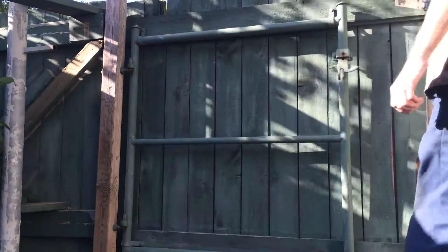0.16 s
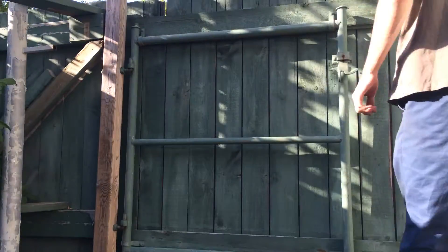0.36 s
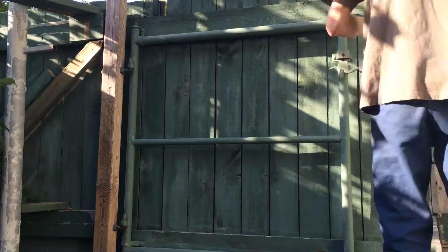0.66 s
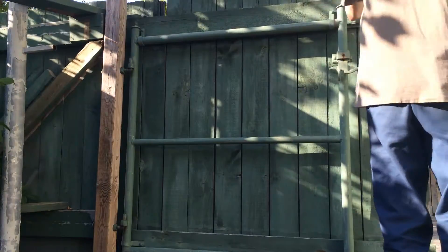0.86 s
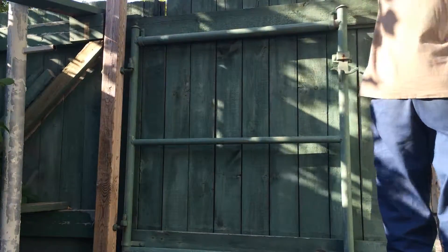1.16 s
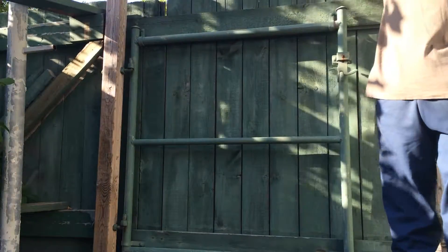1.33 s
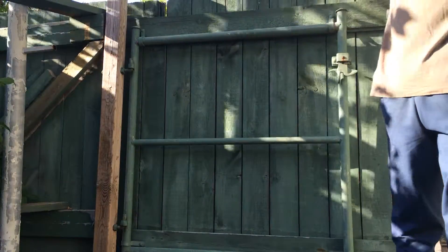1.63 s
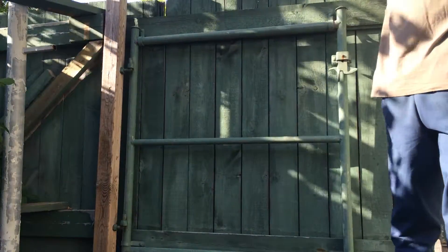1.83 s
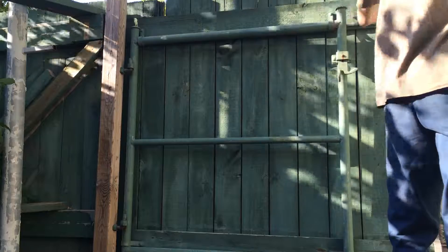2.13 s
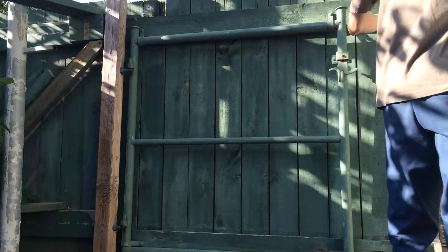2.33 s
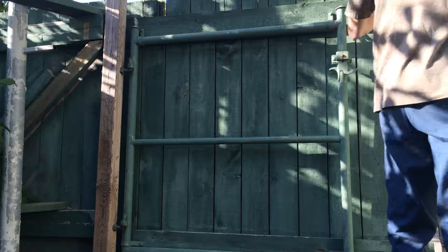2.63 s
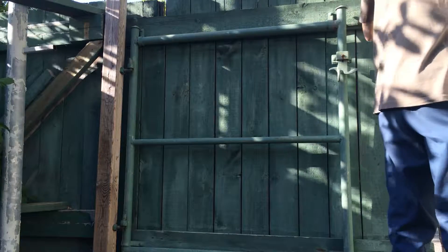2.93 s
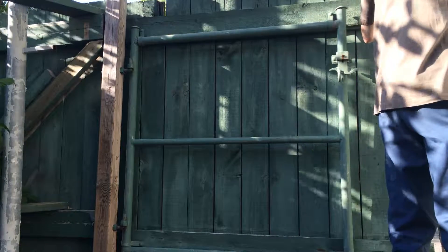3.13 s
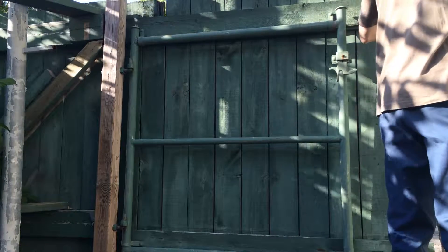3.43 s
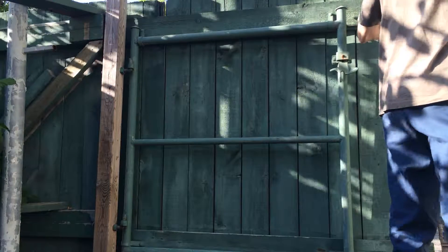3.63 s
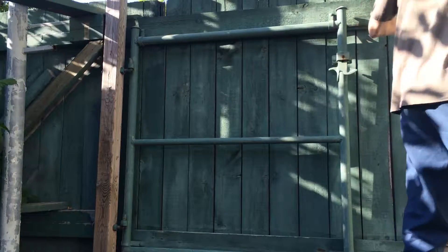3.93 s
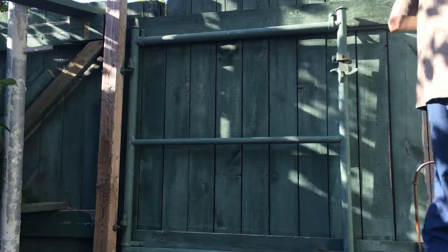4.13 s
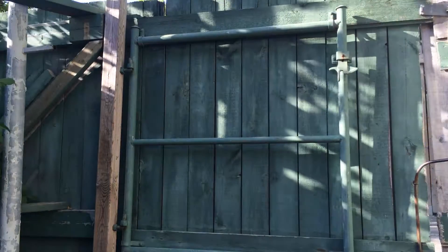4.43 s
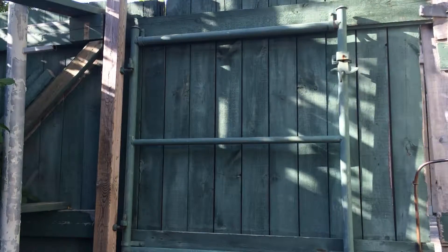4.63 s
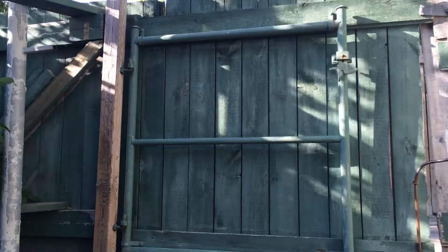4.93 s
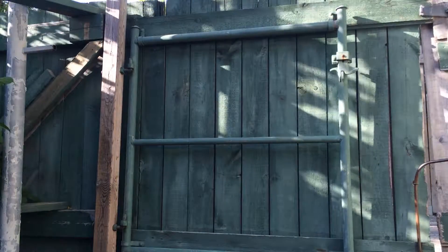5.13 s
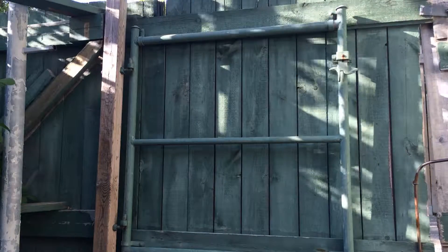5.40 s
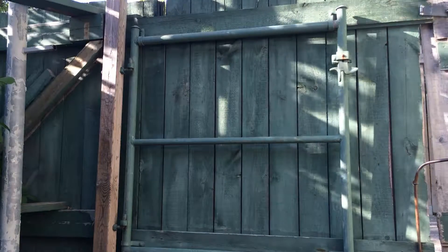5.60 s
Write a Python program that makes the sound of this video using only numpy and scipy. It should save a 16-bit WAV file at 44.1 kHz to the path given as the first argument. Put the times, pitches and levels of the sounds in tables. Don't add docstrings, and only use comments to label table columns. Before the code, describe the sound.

Over a faint outdoor hum, a wooden gate with a steel tube frame is knocked and shaken a few metres from a small microphone. A scrape and wooden thuds come first, then ringing latch drops, a dense run of metal clanks and rattles, a last firm thud, brief hinge squeaks and faint ticks as it settles.

```python
import sys
import numpy as np
from scipy import signal
from scipy.fft import rfft, irfft, next_fast_len
from scipy.io import wavfile
from scipy.ndimage import uniform_filter1d, map_coordinates

SR = 44100
rng = np.random.default_rng(int(sys.argv[2]) if len(sys.argv) > 2 else 0)


def boost_factor(decibels):
    exponent = np.asarray(decibels, float) / 20
    return 10 ** exponent


def master(y):
    cut = np.clip(np.atleast_2d(y).T, -1, 1)
    pcm = np.round(cut * 32767)
    wavfile.write(sys.argv[1], SR, pcm.astype(np.int16))


N = 253969

# freq_hz, density_db
HUM_SPECTRUM = [(12, -47), (20, 0), (178, -7.5), (294, -24.5), (593, -17.5), (807, -23.5), (877, -20.5),
                (1070, -22), (2930, -36), (3980, -35.5), (5270, -38.5), (13300, -48.5), (16200, -53)]
# time_s, pitch_hz, level_db
BIRD_WHISTLE = [
    (5.5, 3358, -62),
    (5.522, 3554, -57),
    (5.536, 4090, -62),
    (5.63, 4010, -73),
]
# freq_hz, t60_s
YARD_DECAY = [(200, 0.26), (1500, 0.36), (5000, 0.27), (14000, 0.18)]

# freq_hz, width_hz, level_db
BOARD_MODES = [(61, 20.3, 2), (107.7, 23.3, 2), (132.6, 54.6, 0), (190.7, 30.7, 1.5), (239, 92, -6)]
# peak_s, level_db
SHAKES = [(0.0, -50), (0.21, -33), (0.3, -26), (0.398, -27), (0.69, -29.5), (1.12, -42.5), (1.39, -36),
          (1.53, -34), (1.63, -23.5), (1.92, -41), (2.05, -45), (2.34, -40), (2.63, -36.5), (2.78, -41),
          (2.9, -35.5), (3.03, -39.5), (3.44, -39), (3.75, -35.5), (4.01, -38), (4.06, -35.5),
          (4.38, -41.5), (4.6, -48), (5.41, -43), (5.66, -51)]
# start_s, peak_db, t60_s
THUDS = [
    (0.317, -24, 0.2),
    (0.373, -16, 0.12),
    (0.669, -23.5, 0.12),
    (1.377, -22, 0.32),
    (1.614, -14, 0.083),
    (4.04, -14, 0.11),
]
# start_s, freq_hz, level_db, t60_s
BOARD_RINGS = [(0.243, 158, -29.5, 0.469), (0.323, 145, -11, 0.076), (0.383, 102, -16, 0.13),
               (0.409, 269, -34.5, 0.23), (0.412, 175, -29, 0.28), (0.672, 170.4, -32, 0.57),
               (0.706, 114, -47, 0.34), (1.381, 111, -28.5, 0.19), (1.383, 194, -36, 0.19),
               (1.618, 145.7, -15.5, 0.15), (1.629, 266.7, -35, 0.37), (1.689, 87, -27, 0.14),
               (2.918, 203, -26, 0.072), (2.991, 192.7, -33, 0.24), (4.043, 202, -24, 0.15),
               (4.071, 84.5, -37, 0.69)]

# peak_s, slip_hz, level_db, octave_db, fade_db_per_s
SQUEAKS = [
    (2.505, 947, -40.5, -25, 399),
    (4.845, 881, -39.5, -6, 803),
    (4.921, 918, -33.5, -14.5, 900),
    (0.95, 2250, -45.5, -9, 300),
    (4.462, 2060, -45, -23, 302),
    (0.093, 1850, -49.5, -12, 400),
]
# time_s, slip_hz, level_db, octave_db
LONG_SQUEAK = [
    (4.335, 880, -53, -12),
    (4.343, 885, -39, -9),
    (4.366, 915, -32, -3),
    (4.374, 884, -40, -6),
    (4.38, 848, -34, 0),
    (4.394, 860, -42, 5),
    (4.404, 856, -38, -17),
    (4.428, 860, -44, -10),
    (4.445, 860, -62, -6.5),
]

BAR_HZ = [3914, 4581, 5324, 6115, 6691, 6993, 7870, 8807, 9800, 10794, 11870, 13033, 14067, 15267]
# width_hz, level_db
BAR_MODES = [(25, 7), (25, 7), (25, 3), (35, -7), (15, -11), (30.2, 10.5), (20.1, 9.5), (40, -4),
             (37.037, -15), (29.6, -2.5), (30, 4), (30, 4), (30, -2), (25, 12.5)]
# time_s, level_db
BAR_RUB = [
    (0.225, -58),
    (0.254, -45.5),
    (0.33, -39),
    (0.382, -28.5),
    (0.4, -52),
    (0.46, -61),
]

# start_s, pitch_hz
PINGS = [(1.340, 10400), (0.697, 5690), (1.478, 2950), (1.515, 2950), (2.345, 10440), (2.9, 9652),
         (4.723, 7540), (3.027, 7790), (3.027, 10370), (3.330, 13240), (3.541, 8500), (3.541, 10350),
         (1.757, 5690), (3.740, 6395), (3.740, 10460), (3.740, 13650), (3.740, 15290), (3.810, 9590),
         (4.140, 4608), (4.140, 7531), (3.335, 14170), (3.027, 15270), (4.723, 4650), (3.330, 8522),
         (1.918, 5690), (2.166, 5690), (4.246, 5690), (2.9, 10370), (3.330, 9658), (0.527, 4899)]
# level_db, t60_s
PING_STRENGTHS = [(-42, 0.083), (-48, 0.72), (-35.5, 0.23), (-33, 0.23), (-30, 0.071), (-30, 0.097),
                  (-62, 0.42), (-29.5, 0.087), (-34, 0.088), (-49, 0.26), (-50, 0.23), (-57, .1),
                  (-51.5, 0.76), (-32, 0.24), (-22, 0.081), (-36, 0.3), (-40, 0.3), (-30, 0.059),
                  (-33, 0.048), (-55, 0.46), (-42, 0.15), (-34, 0.06), (-48, 0.13), (-49, 0.32),
                  (-38, 0.73), (-35, 0.72), (-50.5, 0.49), (-34, 0.2), (-46, 0.28), (-36.5, 0.14)]
# start_s, peak_db
TICKS = [(0.111, -47), (0.6363, -43), (0.6714, -50), (0.946, -46), (1.004, -42), (1.6623, -14.5),
         (4.6724, -52), (4.836, -45.5), (5.1344, -53), (1.659, -15), (5.497, -47)]

# start_s, freq_hz, level_db, t60_s
STEEL_RINGS = [(0.328, 930, -26, 0.028), (0.329, 1211, -28, 0.063), (0.331, 394, -16.5, 0.048),
               (0.331, 708, -35, 0.48), (0.351, 1095, -28, 0.12), (0.367, 435, -18, 0.032),
               (0.416, 373, -26, 0.075), (1.536, 840, -25, 0.036), (1.615, 696, -18.5, 0.04),
               (1.616, 1020, -19.5, 0.035), (1.759, 1150, -23, 0.067), (1.762, 994, -24.5, 0.12),
               (2.304, 953, -15.5, 0.061), (2.313, 477, -25.5, 0.066), (2.34, 958, -26.5, 0.18),
               (2.354, 1224, -28, 0.1), (2.373, 1010, -18, 0.028), (2.899, 938, -16, 0.056),
               (2.9, 1238, -12, 0.059), (2.907, 446, -12.5, 0.026), (2.972, 1117, -26, 0.15),
               (2.973, 950, -30, 0.035), (2.974, 713, -21, 0.052), (2.982, 470, -29, 0.038),
               (3.027, 1170, -7.5, 0.028), (3.314, 739, -12.5, 0.033), (3.329, 974, -20, 0.081),
               (3.333, 740, -19, 0.073), (3.337, 1246, -24, 0.062), (3.372, 1220, -30, 0.055),
               (3.405, 888, -24.5, 0.16), (3.407, 720, -18, 0.04), (3.411, 1238, -26, 0.032),
               (3.519, 780, -17.5, 0.04), (3.542, 776, -30.5, 0.16), (3.543, 1198, -27, 0.107),
               (3.551, 932, -26.5, 0.15), (3.739, 895, -24.5, 0.16), (3.748, 1238, -20, 0.091),
               (3.781, 1130, -23, 0.042), (4.04, 1156, -15.5, 0.054), (4.048, 455, -12.5, 0.027),
               (0.348, 1561, -18, 0.033), (0.533, 1484, -20, 0.032), (0.695, 1600, -20.5, 0.043),
               (1.745, 861, -28, 0.14), (1.658, 1680, -17, 0.038), (1.659, 2976, -29, 0.03),
               (1.659, 2340, -9, 0.039), (1.671, 3160, -18, 0.03), (1.753, 1960, -22, 0.042),
               (1.754, 1530, -18.5, 0.087), (1.756, 3230, -26, 0.11), (1.757, 2374, -13.5, 0.045),
               (1.757, 2960, -18, 0.038), (1.9, 892, -33, 0.28), (1.918, 3700, -26, 0.03),
               (1.919, 1717, -28, 0.089), (1.923, 2430, -22, 0.044), (1.923, 3060, -29, 0.045),
               (2.153, 2460, -21, 0.056), (2.165, 1537, -23, 0.14), (2.166, 1970, -20, 0.05),
               (2.169, 3280, -21, 0.037), (1.662, 800, -33.5, 0.16), (2.179, 2984, -21, 0.071),
               (2.301, 1864, -21.5, 0.16), (2.302, 2560, -20, 0.035), (2.341, 1600, -12, 0.044),
               (2.339, 1868, -18, 0.032), (2.343, 2350, -26, 0.13), (2.364, 2340, -25, 0.066),
               (2.365, 1830, -17, 0.042), (2.898, 2210, -28, 0.079), (2.905, 1540, -17, 0.053),
               (2.908, 2420, -22, 0.03), (2.984, 1694, -15, 0.036), (3.025, 2372, -26, 0.094),
               (3.041, 1660, -8.5, 0.029), (3.323, 1930, -20, 0.037), (3.349, 1620, -31, 0.059),
               (3.401, 1870, -31, 0.03), (3.407, 1486, -31, 0.17), (3.552, 1625, -33, 0.028),
               (3.742, 1890, -19, 0.038), (3.786, 1504, -22.5, 0.07), (3.945, 1310, -24, 0.042),
               (4.037, 1344, -25, 0.082), (4.036, 1840, -19, 0.03), (4.048, 1600, -34, 0.07),
               (3.942, 1960, -29, 0.085),
    (4.238, 1173, -30, 0.078),
    (4.393, 2220, -29, 0.03),
    (4.556, 1040, -27, 0.026),
    (4.563, 876, -33, 0.075),
]

# freq_hz, width_hz, level_db
TUBE_MODES = [(413, 71, 5), (483.6, 48, 6), (624, 175, 2.5)]
# freq_hz, width_hz, level_db
FRAME_MODES = [(750, 94, -2), (934, 126, 0.5), (1095, 64, 3), (1238, 87, 1.5), (1500, 56, 1.5),
               (1621, 43, 3), (1900, 270, 0), (2395, 254, -5.5), (2985, 280, -10.5)]
# freq_hz, width_hz, level_db
PLATE_MODES = [(1003, 170, -7.5), (1387, 160, -5.5), (1590, 84, -2.5), (1741, 50, 3), (1984, 120, -3.5),
               (2374, 95, -4.5), (3120, 240, -7)]
# freq_hz, level_db
STEEL_SPECTRUM = [(1500, -29), (2600, -1), (4200, -2.5), (6500, -6), (9000, -22.5), (16000, -59)]
# freq_hz, level_db
AIR_SPECTRUM = [(4000, -36), (7000, 3), (10000, 2.5), (13000, -9), (15500, -7)]
# start_s, length_s, frame_db, bright_db, plate_db
RUBS = [
    (5.43, 0.13, -59.5, -2, -15),
    (0.26, 0.15, -33, -3.5, -17),
    (1.368, 0.22, -35, -7.5, -2.5),
    (2.234, 0.14, -29.5, -14, -8),
    (3.343, 0.071, -26.5, -6.5, -14),
    (3.536, 0.086, -32, -19, -22),
    (3.755, 0.095, -34, -1.5, -12),
    (5.344, 0.058, -46.5, 1, -20),
]
# start_s, peak_db, bright_db, t60_s
TUBE_KNOCKS = [(0.217, -28.5, -17, 0.59), (0.327, -15, -11.5, 0.31), (0.419, -26.5, -0.5, 0.065),
               (1.557, -19.5, -20.5, 0.085), (1.863, -24.5, -16, 0.15), (2.805, -26, -26, 0.2),
               (2.895, -9.5, -13, 0.11), (3.516, -15, -26, 0.03), (3.642, -15.5, -37, 0.046),
               (5.317, -25, -15.5, 0.086), (5.357, -31, -6.5, 0.14), (5.388, -26.5, -29, 0.078)]
# start_s, peak_db, bright_db, t60_s
FRAME_KNOCKS = [(2.3, -6.5, -21.5, 0.12), (2.339, -17.5, -14.5, 0.18), (2.362, -12.5, -18.5, 0.042),
                (3.024, -9.5, -19, 0.11), (3.259, -18.5, -19, 0.16), (3.31, -13.5, -20.5, 0.42),
                (3.4, -17, -34, 0.19), (3.539, -14, -25.5, 0.13), (3.713, -18.5, -16, 0.19),
                (3.735, -12.5, -9, 0.16), (3.807, -17, -12.5, 0.088), (3.936, -16, -38, 0.13),
                (4.904, -43.5, -17, 0.57), (0.645, -39.5, -11, 0.25)]
# start_s, peak_db, bright_db, t60_s
CATCH_KNOCKS = [(0.669, -26, -17, 0.44), (1.337, -22, -7.5, 0.066), (1.527, -19.5, -18, 0.17),
                (3.61, -21.5, -22, 0.14), (3.852, -15.5, -31, 0.067), (3.918, -29, -22, 0.17),
                (4.139, -21.5, -17, 0.14), (4.394, -26, -30, 0.15), (4.556, -18.5, -34, 0.06),
                (4.721, -24.5, -15, 0.15), (5.208, -32.5, -7, 0.078)]
# start_s, peak_db, bright_db, t60_s
HELD_KNOCKS = [
    (0.287, -19.5, -5.5, 0.061),
    (1.376, -20, -23, 0.21),
    (1.403, -29.5, -8.5, 0.12),
    (1.478, -20, -20.5, 0.18),
    (4.273, -39.5, 2.5, 0.04),
]
# start_s, peak_db, bright_db, t60_s
SOFT_KNOCKS = [
    (2.605, -28, -13, 0.23),
    (2.7, -36.5, -25, 0.28),
    (2.855, -31.5, -22.5, 0.29),
    (2.969, -15, -19, 0.15),
]
# airy_over_bright_db, hollow_db
KNOCK_KINDS = [
    (-2, -4.5),
    (0, -12.5),
    (-8.5, -10),
    (-9.5, -28),
    (-8.5, -1),
]
# start_s, peak_db, bright_db, hollow_db
BUMPS = [(0.196, -27, -23, 3.5), (0.515, -21.5, -15, -33), (1.214, -39.5, -29, -20), (1.254, -38, -30, -22),
         (1.302, -28.5, -40, -33), (1.612, -22, -20, 4), (1.741, -17, -8, -20), (1.906, -22, -14, -31),
         (2.479, -35, -31, -10), (4.01, -32.5, -20, -4), (4.033, -15, -36, -1.5), (4.235, -21, -30, -16),
         (4.599, -43, -17, -16), (5.197, -36.5, -31.5, -27), (5.64, -41, -21, -7)]

# start_s, peak_db, airy_db, ring_db, chatter_t60_s
LATCH_DROPS = [
    (0.527, -17.5, -24, -23, 0.068),
    (0.695, -16.5, -10.5, -17, 0.099),
    (1.651, -18, -13, -16, 0.25),
    (1.658, -12.5, -6, -14.5, 0.053),
    (1.757, -14.5, -10.5, -15.5, 0.13),
    (1.916, -15, -5.5, -14.5, 0.18),
    (2.147, -21, -16.5, -16.5, 0.33),
    (2.164, -18.5, -16, -10, 0.15),
    (4.247, -19, -39, -29.5, 0.11),
]
LATCH_HZ = [1270, 1325, 1427, 1976, 2350, 2433, 2930, 3028, 3955, 4101, 4237, 4297, 4823, 5690, 6186, 6966,
            7343, 8624, 9220, 10805, 11460, 11620, 11890, 12360, 14050, 14990]
# level_db, t60_s
LATCH_MODES = [(-4, 0.23), (-4, 0.33), (-0.5, 0.29), (0, 0.1), (6, 0.071), (-8, 0.075), (-16, 0.21),
               (2.5, 0.08), (-20, 0.52), (-3.5, 0.62), (-7, 0.31), (1, 0.16), (-21, 0.47), (-30, 0.6),
               (-8.5, 0.45), (-26, .25), (-35, 0.17), (-5, 0.22), (-8, 0.12), (-8.5, 0.26), (-21, 0.12),
               (-10.5, 0.2), (-18, 0.12), (-14, 0.11), (-18, 0.09), (-29, 0.26)]
STOPS_S = [
    .63,
    1.745,
    1.905,
    2.303,
    9,
]
SIDEWAYS_S = [.527, 1.757]
MUTED_HZ = [4101, 6186, 9220, 10805, 11620]
FAVOURED_HZ = [1325, 3955]


def unit(x):
    return x / np.sqrt(np.mean(x ** 2) + 1e-20)


def along(points, hz):
    f, value = np.transpose(points)
    return np.interp(np.log(hz + 1), np.log(f + 1), value)


def curves(rows):
    s, *columns = np.transpose(rows)
    t = np.arange(N) / SR
    gate = np.clip(np.minimum(t - s[0], s[-1] - t) / 0.01 + 0.5, 0, 1)
    return [gate] + [np.interp(t, s, column) for column in columns]


def wobble(rate):
    knots = rng.standard_normal(int(N * rate / SR) + 4)
    return map_coordinates(knots, [np.arange(N) * rate / SR])


def swell(s, length, rise, fall):
    t = np.arange(N) / SR - s
    return np.minimum(0, np.minimum(rise * t, fall * (length - t)))


def filtered(x, response):
    m = next_fast_len(N + SR // 2)
    h = response(np.fft.rfftfreq(m, 1 / SR))
    h = h / np.sqrt(np.mean(np.abs(h) ** 2))
    return irfft(rfft(x, m) * h, m)[:N]


def highpass(f, corner_hz):
    return (1j * f / corner_hz / (1 + 1j * f / corner_hz)) ** 2


def lowpass(f, corner_hz):
    return 1 / (1 + 1j * f / corner_hz) ** 2


def resonant(modes):
    def response(f):
        total = 0
        for k, (hz, width, db) in enumerate(modes):
            total = total + (-1) ** k * boost_factor(db) * 1j * f * width / (hz * hz - f * f + 1j * f * width)
        return total
    return response


def mottled(depth_db, size):
    z = signal.stft(rng.standard_normal(N), nperseg=512)[2]
    field = uniform_filter1d(rng.standard_normal(z.shape), size[0], axis=0)
    field = uniform_filter1d(field, size[1], axis=1)
    return unit(signal.istft(z * boost_factor(depth_db * unit(field)), nperseg=512)[1][:N])


def grit(lumpy_db, modes_db):
    return unit(mottled(modes_db, size=(1, 9)) * boost_factor(lumpy_db * wobble(350)))


def add(track, s, x):
    part = track[round(s * SR):][:len(x)]
    part += x[:len(part)]


def ring(hz, db, t60):
    t = np.arange(int(0.7 * SR)) / SR
    phase = rng.random(np.shape(hz))
    tones = boost_factor(db - 60 * t / t60) * np.sin(2 * np.pi * (hz * t + phase))
    return np.atleast_2d(tones).sum(0) * (1 - np.exp(-t / 0.0026))


def stopped(s, tone):
    next_stop = min(g for g in STOPS_S if g > s)
    held = np.arange(len(tone)) / SR + s - next_stop
    return tone * boost_factor(-60 * np.clip(held, 0, None) / 0.049)


def hum():
    patches = mottled(depth_db=2.5, size=(6, 14))
    return boost_factor(-49.5) * filtered(patches, lambda f: boost_factor(along(HUM_SPECTRUM, f)))


def bird():
    gate, hz, db = curves(BIRD_WHISTLE)
    turn = 2 * np.pi * np.cumsum(hz * (1 + 0.01 * wobble(80))) / SR
    return gate * boost_factor(db - 8 + 5 * wobble(60)) * np.sin(turn)


def yard(x):
    hz, t, z = signal.stft(rng.standard_normal(SR // 2), SR, nperseg=256)
    fall_db = -60 * t / along(YARD_DECAY, hz)[:, None]
    tail = signal.istft(z * boost_factor(fall_db), SR, nperseg=256)[1]
    delayed = np.pad(x, (300, 0))
    return signal.fftconvolve(delayed, tail / np.linalg.norm(tail))[:N]


def boards():
    sway_db = -49
    power = boost_factor(2 * sway_db)
    for s, db in SHAKES:
        power = power + boost_factor(2 * (db + swell(s, 0, rise=196, fall=109.5)))
    shake = np.sqrt(power) * boost_factor(2.25 * wobble(25) - 3.5) * rng.standard_normal(N)
    thuds, t = np.zeros(N), np.arange(SR // 2) / SR
    for s, db, t60 in THUDS:
        add(thuds, s, boost_factor(db - 11.5 - 60 * t / t60) * rng.standard_normal(len(t)))
    wood = lambda f: resonant(BOARD_MODES)(f) * lowpass(f, 400)
    return filtered(shake, wood) + filtered(thuds, lambda f: wood(f) * highpass(f, 120))


def stick_slip(turn, db, tones, rough_db):
    return sum(boost_factor(db + tone_db + rough_db * wobble(120)) * np.sin(k * turn) for k, tone_db in tones)


def hinge():
    out, t = np.zeros(N), np.arange(N) / SR
    longest_s, sag_per_s = 0.059, 0.3
    for s, hz, db, octave_db, fade in SQUEAKS:
        rate = hz * (1 - sag_per_s * np.clip(t - s, -longest_s, longest_s))
        turn = 2 * np.pi * np.cumsum(rate * (1 + 0.025 * wobble(200))) / SR
        level = db + swell(s, 0, 1300, fade) + swell(0, s + longest_s, 1, 2000)
        tones = [(1, 0), (2, octave_db), (3, octave_db - 21), (4, octave_db - 25)]
        out += stick_slip(turn, level, tones, rough_db=3.4)
    return out


def long_squeak():
    gate, hz, db, octave_db = curves(LONG_SQUEAK)
    turn = 2 * np.pi * np.cumsum(hz * (1 + 0.012 * wobble(200))) / SR
    tones = [(1, 0), (2, octave_db), (3, octave_db - 17), (4, octave_db - 18)]
    return gate * stick_slip(turn, db, tones, rough_db=1.4)


def bar():
    gate, db = curves(BAR_RUB)
    modes = [(hz, width, mode_db) for hz, (width, mode_db) in zip(BAR_HZ, BAR_MODES)]
    return filtered(gate * boost_factor(db + 6) * grit(lumpy_db=3, modes_db=0), resonant(modes))


def loose_parts():
    pings, ticks, t = np.zeros(N), np.zeros(N), np.arange(SR // 20) / SR
    for (s, hz), (db, t60) in zip(PINGS, PING_STRENGTHS):
        tone = ring(hz, db, t60)
        add(pings, s, stopped(s, tone) if hz in LATCH_HZ else tone)
    for s, db in TICKS:
        add(ticks, s, boost_factor(db - 2 - 60 * t / 0.008) * rng.standard_normal(len(t)))
    return pings + filtered(ticks, lambda f: highpass(f, 2500) * lowpass(f, 7000))


def woken(rows, attack_s):
    out, t = np.zeros(N), np.arange(SR // 2) / SR
    shiver = np.tile(0.073 * wobble(130), 2)
    for (s, hz, db, t60), phase in zip(rows, rng.random(len(rows))):
        rise = (1 - np.exp(-t / attack_s)) ** 2
        turns = hz * t + phase + shiver[int(phase * N):][:len(t)]
        fall_db = -60 * t / np.clip(t60, 0.02, 0.5)
        add(out, s, boost_factor(db + 1.5 + fall_db) * rise * np.sin(2 * np.pi * turns))
    return out * boost_factor(1.44 * wobble(150))


def hits():
    rows = []
    for s, db, airy_db, _, t60 in LATCH_DROPS:
        bright_db = -5 + 0.29 * airy_db
        rows.append((s, db, bright_db, airy_db, -16.5, t60))
    groups = [TUBE_KNOCKS, FRAME_KNOCKS, CATCH_KNOCKS, HELD_KNOCKS, SOFT_KNOCKS]
    for knocks, (airy_db, hollow_db) in zip(groups, KNOCK_KINDS):
        for s, db, bright_db, t60 in knocks:
            rows.append((s, db, bright_db, bright_db + airy_db, hollow_db, t60))
    for s, db, bright_db, hollow_db in BUMPS:
        rows.append((s, db, bright_db, -40, hollow_db, 0.16))
    return rows


def chatter():
    hollow, frame, plate, bright, airy = np.zeros((5, N))
    t = np.arange(SR // 2) / SR
    for k, (s, db, bright_db, airy_db, hollow_db, t60) in enumerate(hits()):
        body = plate if k < len(LATCH_DROPS) else frame
        fall_db = -60 * t / t60
        blow = 1 + 0.88 * np.exp(-t / 0.0006)
        add(hollow, s, boost_factor(db + hollow_db - 7.5 + fall_db) * (1 - np.exp(-t / 0.0013)))
        add(body, s, boost_factor(db - 10 + fall_db) * (1 - np.exp(-t / 0.00073)) * blow)
        add(bright, s, boost_factor(db + bright_db - 1.5 + 1.075 * fall_db) * (1 - np.exp(-t / 0.0016)))
        add(airy, s, boost_factor(db + airy_db - 3 + 1.45 * fall_db) * (1 - np.exp(-t / 0.00083)))
    for s, length, db, bright_db, plate_db in RUBS:
        gate = boost_factor(swell(s, length, rise=339, fall=363))
        hollow = np.hypot(hollow, gate * boost_factor(db - 12))
        frame = np.hypot(frame, gate * boost_factor(db - 6 + 1.4 * wobble(45)))
        plate = np.hypot(plate, gate * boost_factor(db + plate_db))
        bright = np.hypot(bright, gate * boost_factor(db + bright_db - 9))
        airy = np.hypot(airy, gate * boost_factor(db + 2.66 * bright_db - 11))
    dull = lambda f: lowpass(f, 3300)
    return (filtered(hollow * grit(lumpy_db=1.5, modes_db=1.45), lambda f: resonant(TUBE_MODES)(f) * dull(f))
            + filtered(frame * grit(lumpy_db=1.5, modes_db=1.5), lambda f: resonant(FRAME_MODES)(f) * dull(f))
            + filtered(plate * grit(lumpy_db=1, modes_db=1.5), lambda f: resonant(PLATE_MODES)(f) * dull(f))
            + filtered(bright * grit(lumpy_db=1.64, modes_db=6.5), lambda f: boost_factor(along(STEEL_SPECTRUM, f)))
            + filtered(airy * grit(lumpy_db=1.8, modes_db=7.5), lambda f: boost_factor(along(AIR_SPECTRUM, f))))


def latch():
    out = np.zeros(N)
    level, t60 = np.transpose(LATCH_MODES)[:, :, None]
    hz = np.array(LATCH_HZ)[:, None]
    octaves_up = np.clip(np.log2(hz / 4500), 0, None)
    sideways_db = -6 * np.isin(hz, MUTED_HZ) + 8.5 * np.isin(hz, FAVOURED_HZ)
    for s, db, airy_db, ring_db, _ in LATCH_DROPS:
        sideways = any(abs(s - when) < 0.005 for when in SIDEWAYS_S)
        dull_db = 0.93 * (airy_db + 11.5) * octaves_up
        chance_db = rng.normal(0, 2.5, hz.shape)
        mode_db = db + ring_db + dull_db + level + sideways * sideways_db + chance_db
        add(out, s, stopped(s, ring(hz, mode_db, t60)))
    return out


def scene():
    background = hum() + bird()
    wood = boards() + woken(BOARD_RINGS, attack_s=0.0048)
    gate = hinge() + long_squeak() + bar() + loose_parts() + chatter() + latch()
    rings = woken(STEEL_RINGS, attack_s=0.0019)
    echoes = boost_factor(-13) * yard(gate + rings / 2)
    return (background + wood + gate + rings + echoes)[None]


def top_cut(x):
    return signal.sosfilt(signal.butter(12, 16300, fs=SR, output="sos"), x)


def record(dry):
    colour = lambda f: highpass(f, 45) / np.sqrt(1 + (f / 15300) ** 200)
    mix = filtered(dry[0], colour)[None]
    return top_cut(mix)


dry = scene()
out = record(dry)
master(out)
```